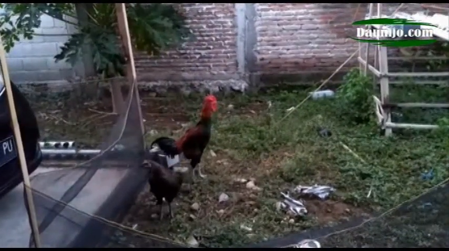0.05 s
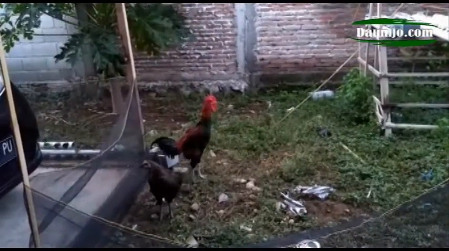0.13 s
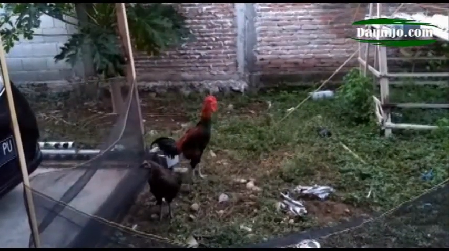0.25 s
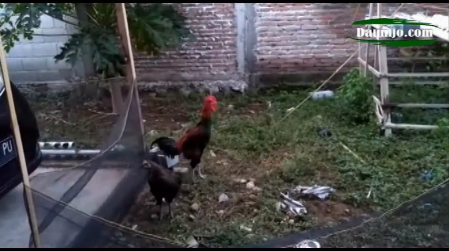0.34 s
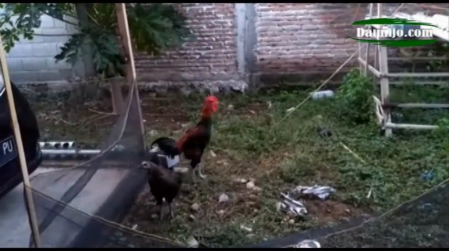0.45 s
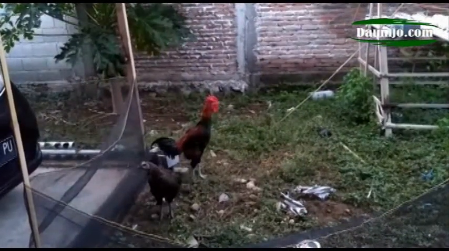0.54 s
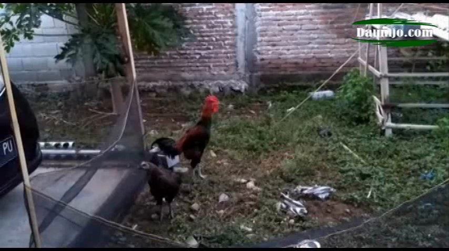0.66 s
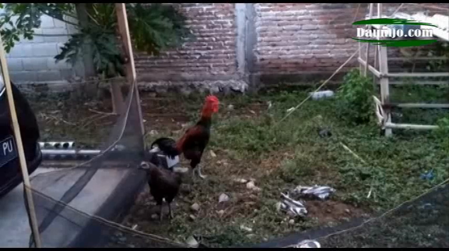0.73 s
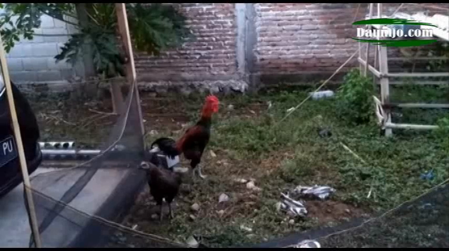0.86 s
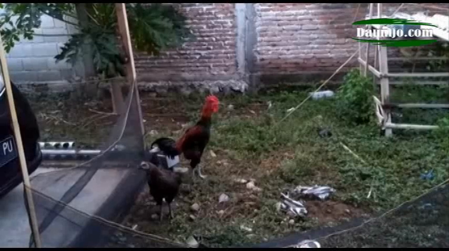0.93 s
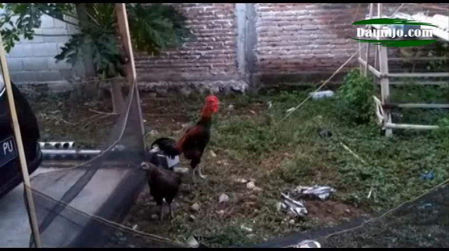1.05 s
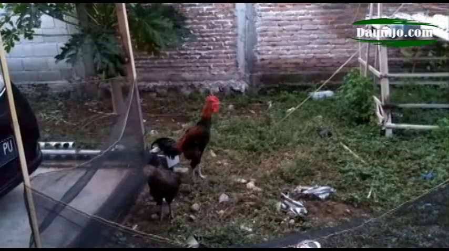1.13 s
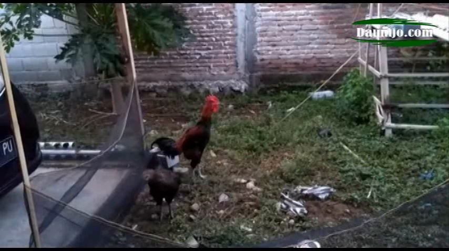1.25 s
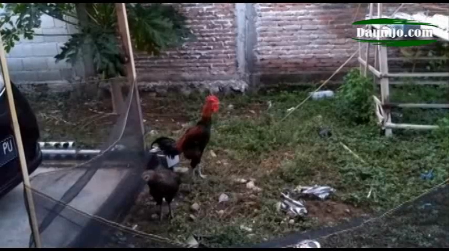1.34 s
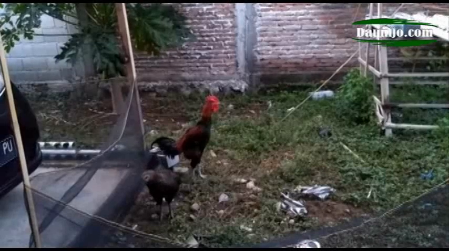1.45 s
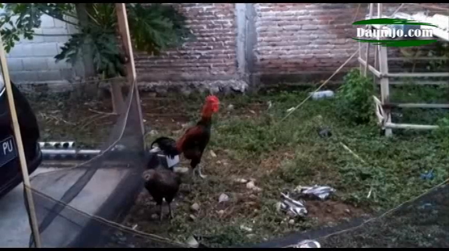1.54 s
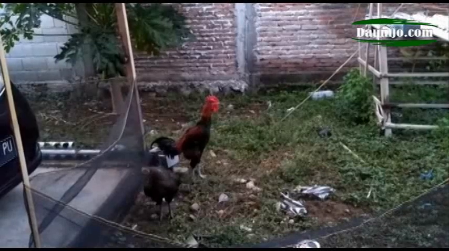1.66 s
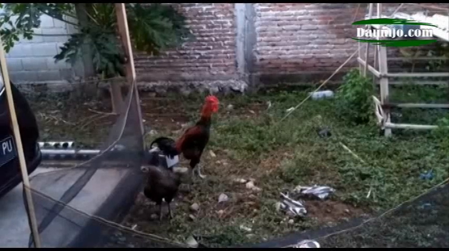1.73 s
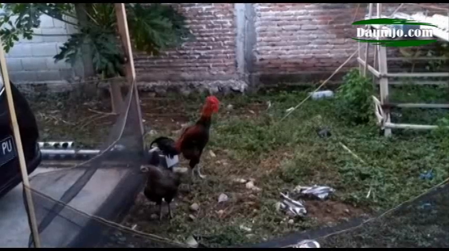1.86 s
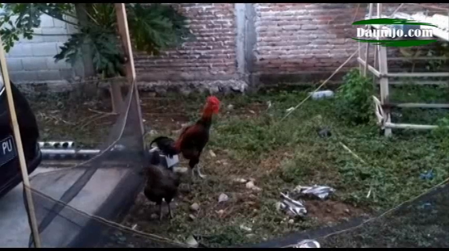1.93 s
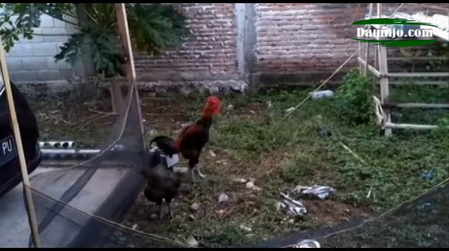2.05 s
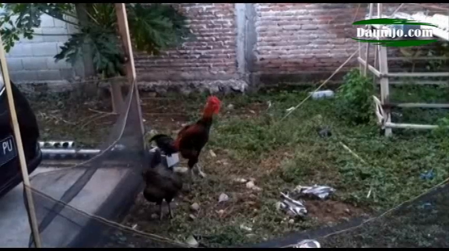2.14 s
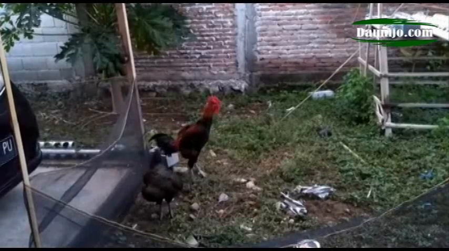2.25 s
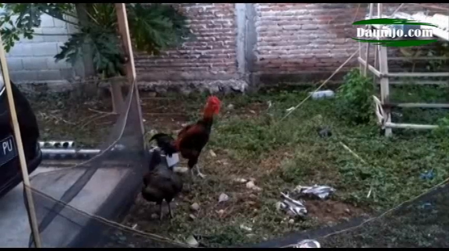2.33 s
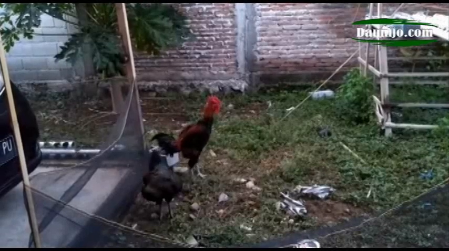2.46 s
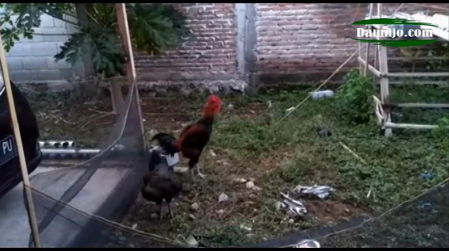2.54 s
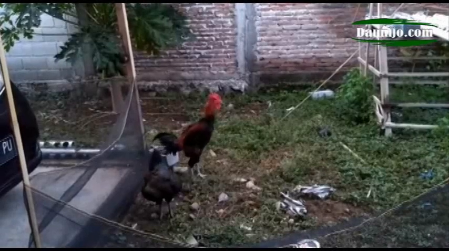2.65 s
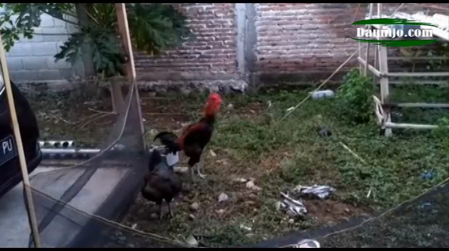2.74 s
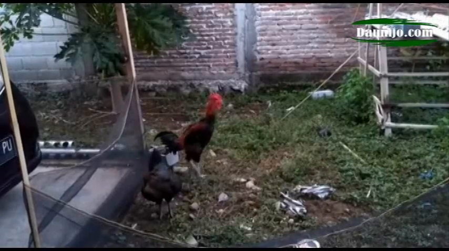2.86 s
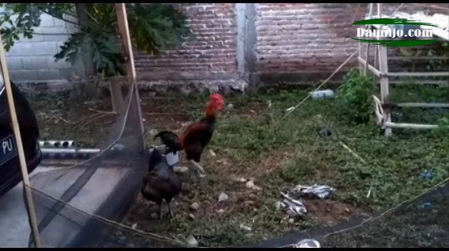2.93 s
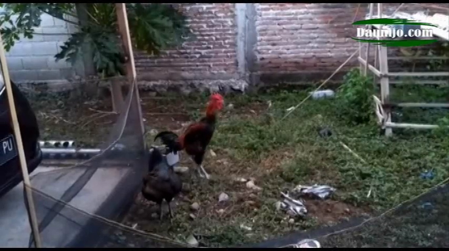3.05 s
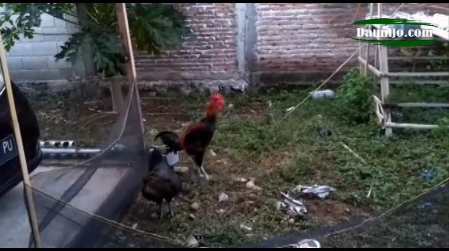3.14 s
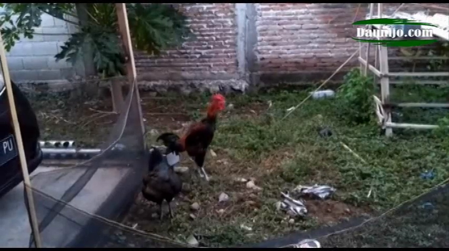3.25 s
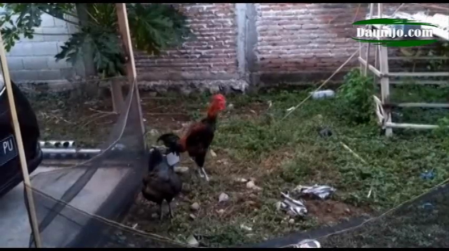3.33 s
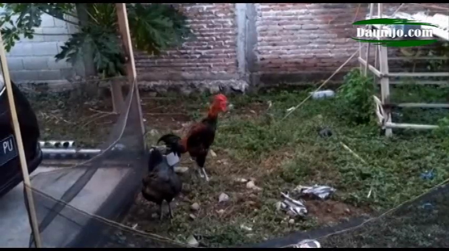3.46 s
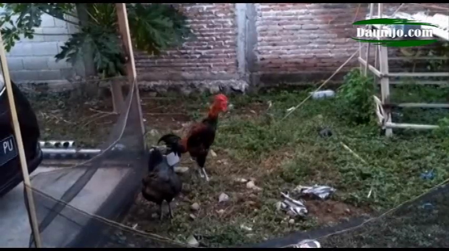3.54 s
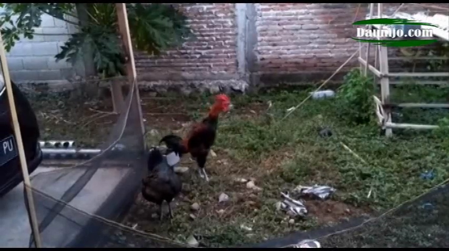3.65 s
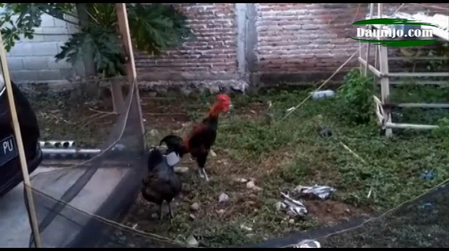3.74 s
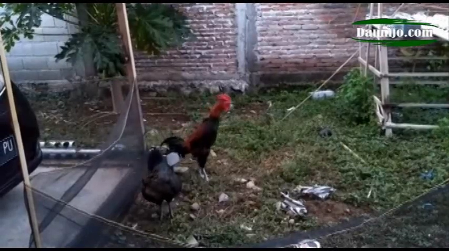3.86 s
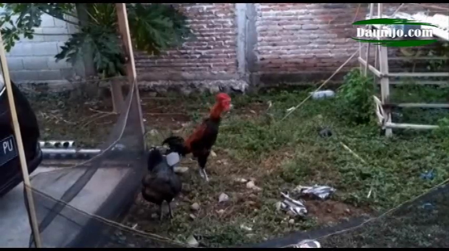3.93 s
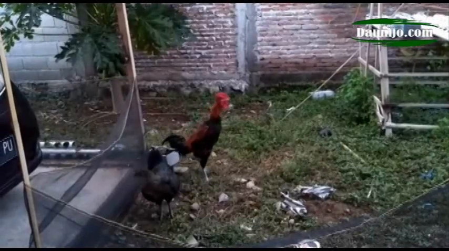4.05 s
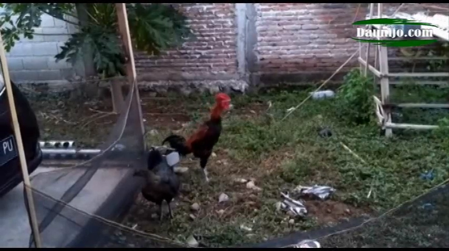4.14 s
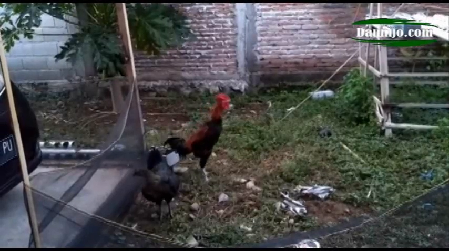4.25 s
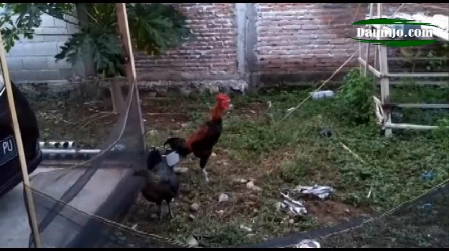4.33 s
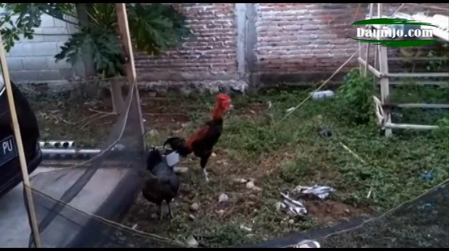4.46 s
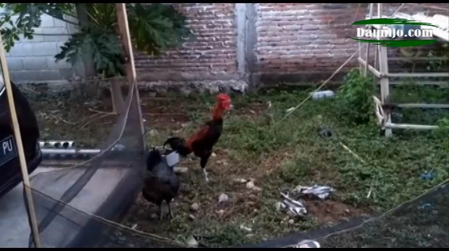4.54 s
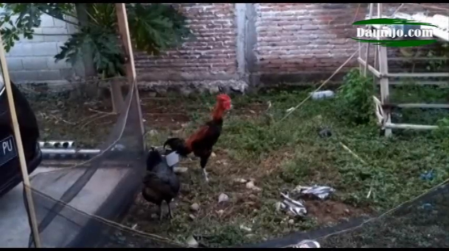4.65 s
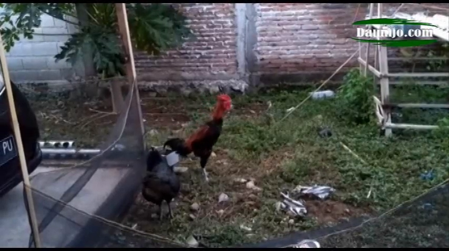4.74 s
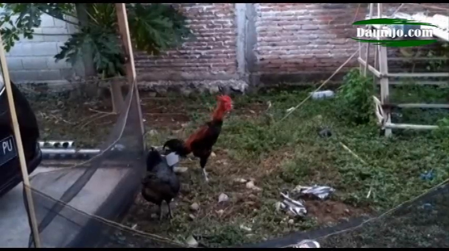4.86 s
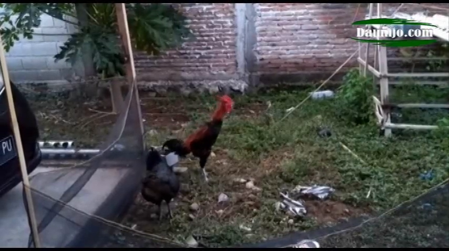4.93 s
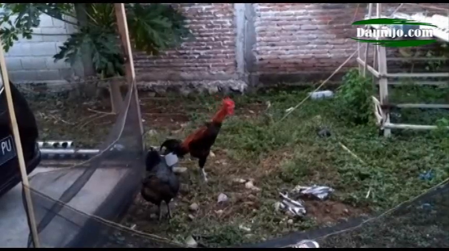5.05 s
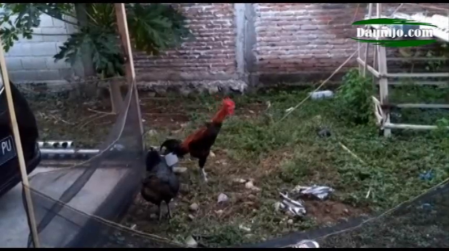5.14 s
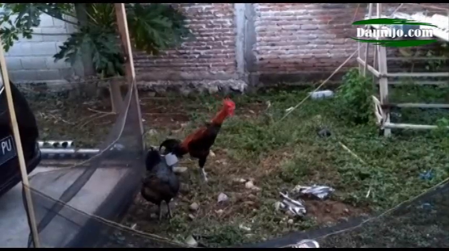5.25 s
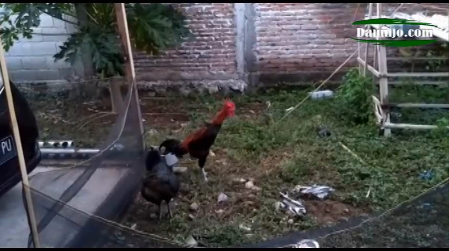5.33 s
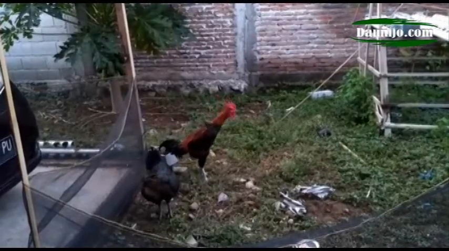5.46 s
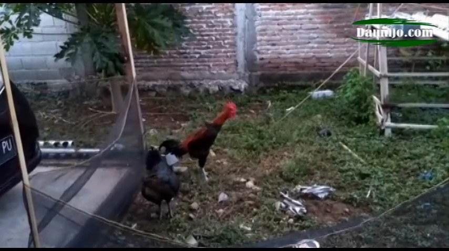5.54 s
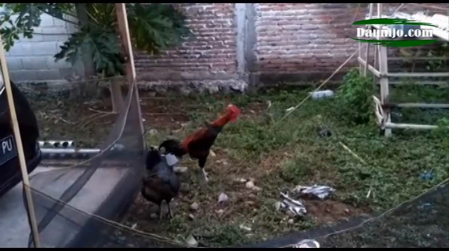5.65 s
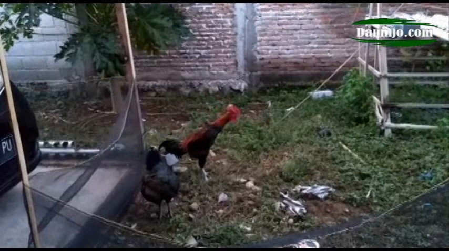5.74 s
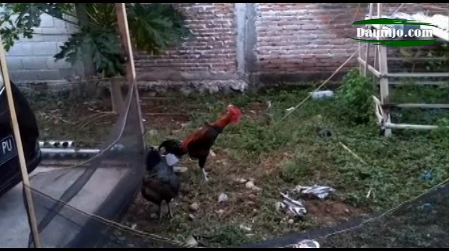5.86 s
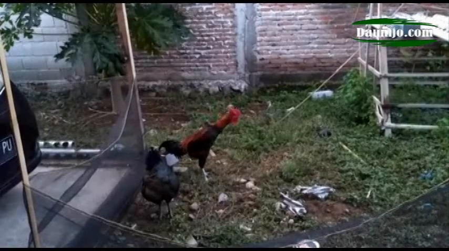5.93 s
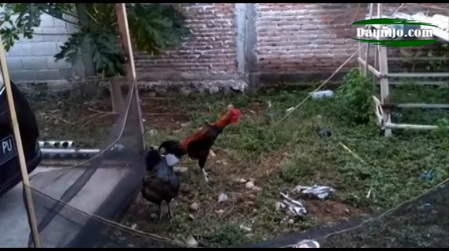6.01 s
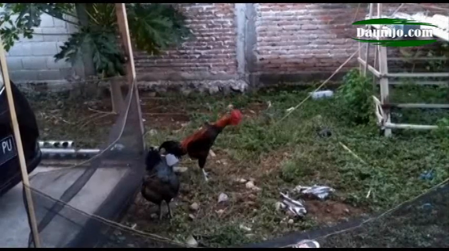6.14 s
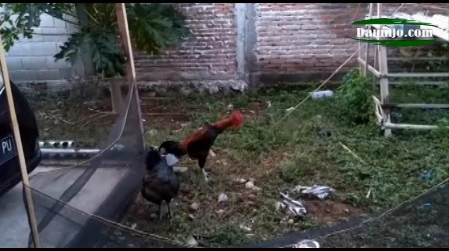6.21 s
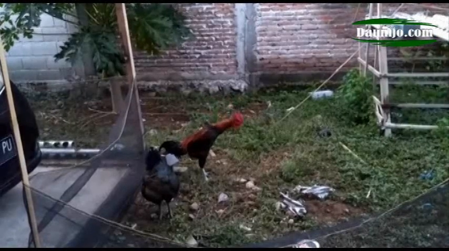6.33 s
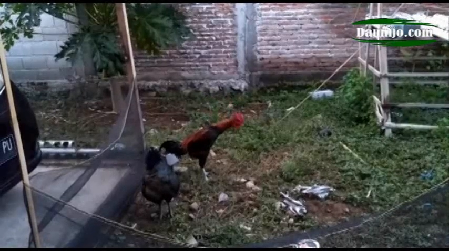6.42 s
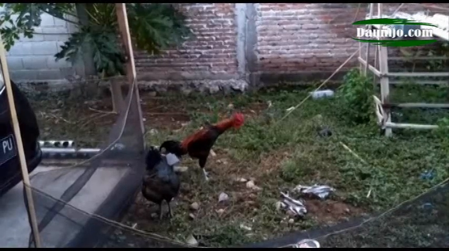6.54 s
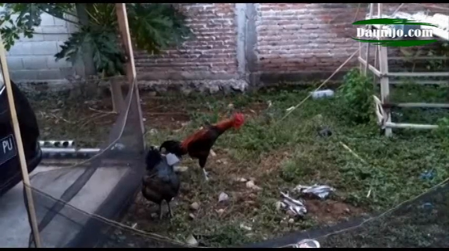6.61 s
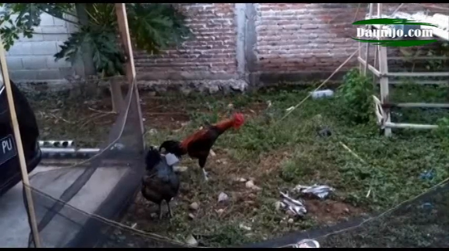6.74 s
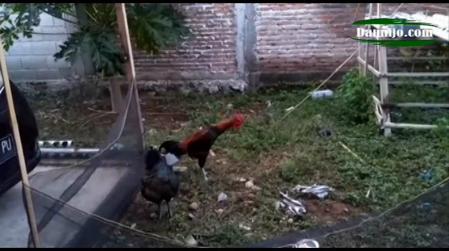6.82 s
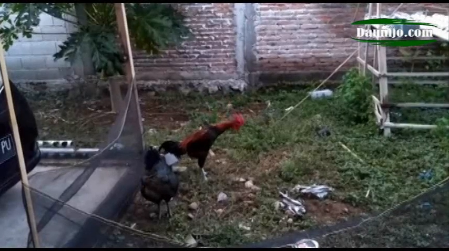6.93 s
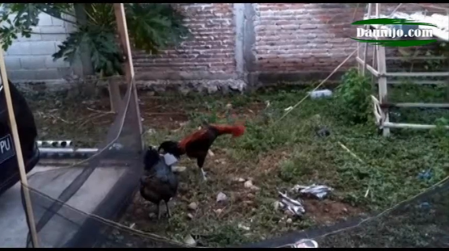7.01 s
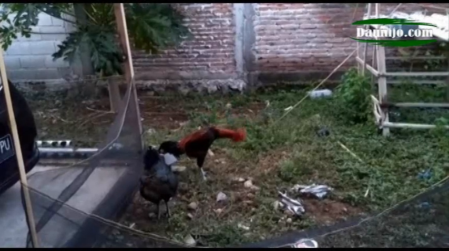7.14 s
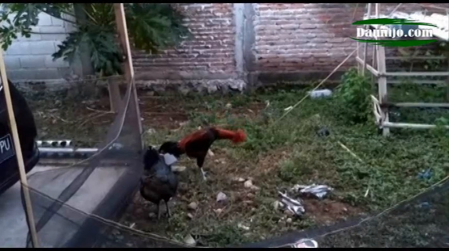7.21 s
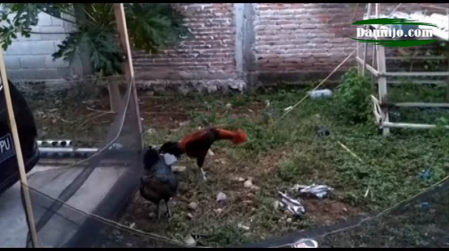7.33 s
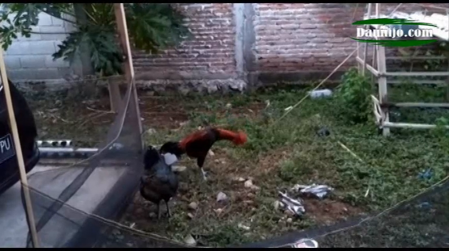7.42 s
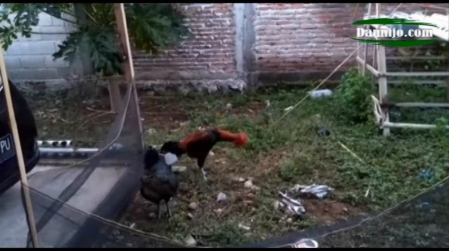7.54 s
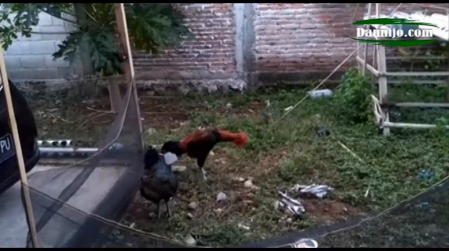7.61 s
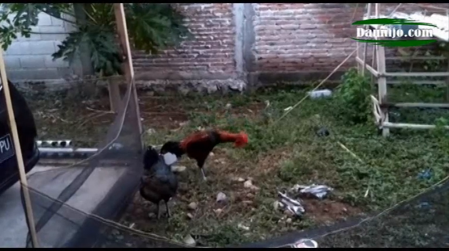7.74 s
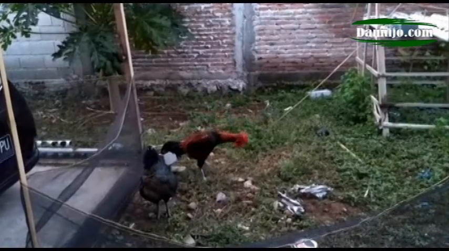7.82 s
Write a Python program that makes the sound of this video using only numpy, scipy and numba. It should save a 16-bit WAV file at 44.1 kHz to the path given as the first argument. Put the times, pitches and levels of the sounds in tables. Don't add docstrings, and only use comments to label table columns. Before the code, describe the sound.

A cricket chirps rapidly in a walled yard over faint insect drone, then a rooster rasps and holds a long, clear crow.

```python
import sys
import numpy as np
from scipy import signal
from scipy.fft import rfft, irfft
from scipy.io import wavfile
from scipy.ndimage import uniform_filter1d
from numba import njit

SR = 44100
rng = np.random.default_rng(int(sys.argv[2]) if len(sys.argv) > 2 else 0)


def transcribe(signal):
    frames = np.atleast_2d(signal).T
    limited = np.clip(frames, -1, 1)
    pcm = np.round(limited * 32767).astype(np.int16)
    wavfile.write(sys.argv[1], SR, pcm)


def nominal_scale(level):
    x = np.asarray(level, float) / 20
    return 10 ** x


N = 347508
TIME = np.arange(N) / SR
SOURCE_SR = 48000

# f/Hz, width/Hz, level/dB
HUM_MODES = [(79, 13, -9), (95.5, 12, -1.5), (120.4, 8, 4.5), (150.65, 6, 1.5), (184, 12, -10.5)]
# t/s, length/s, level/dB
ENGINES = [(-.2, 0.59, -62), (.35, 1.39, -60), (1.497, 0.56, -64), (2.194, 0.85, -66), (3.194, 0.83, -65.5),
           (4.2, .5, -66), (4.747, 0.66, -66), (5.701, 0.46, -76), (6.8, 0.87, -70)]
# f/Hz, density/dB per Hz
AIR_COLOUR = [(12, -59.5), (22, -6.5), (145, 0.5), (270, -15), (1200, -28), (2300, -31), (3000, -19.5),
              (4700, -32), (5400, -40), (7500, -21), (15700, -42), (20000, -51)]
AIR_DB = -73.5

# start t/s, end t/s, level/dB
CHOIR_BOUTS = [(-.5, 0.87, -69.5), (.7, 1.51, -65.5), (2.08, 3.29, -66), (3.2, 9, -66)]
CHOIR_HZ, CHOIR_FADE_S, CHOIR_WARMUP_HZ = 3625, 0.18, 90

# t/s, length/s, start f/Hz, end f/Hz, level/dB
BUZZES = [(-.1, 0.24, 7550, 7700, -71.5), (0.352, 0.33, 7530, 7300, -58.5),
          (0.701, 0.36, 7570, 7260, -57.5), (1.28, 0.23, 7100, 7050, -71.5), (1.5, .45, 6950, 6950, -85),
          (1.915, 0.29, 8000, 7900, -71.5), (2.87, 0.32, 7240, 7650, -63.5), (3.18, 0.42, 7200, 7650, -64),
          (3.6, 0.3, 7500, 7100, -65), (5.329, 0.24, 7380, 7240, -58), (5.713, 0.23, 7470, 7400, -63)]
# buzz level/dB, octave relative level/dB
BUZZ_OCTAVE = [(-63, -20), (-58, -9)]

# t/s, peak level/dB
CHIRPS = [(-.0626, -39), (.369, -39), (.605, -39), (.84, -38), (1.0802, -38.5), (1.3161, -39),
          (1.5545, -39.5), (1.7945, -39), (2.0303, -38), (2.2676, -38), (2.506, -39), (2.77, -39),
          (3.0073, -38.5), (3.448, -38.5), (3.713, -39), (5.4865, -37.5), (5.7257, -37), (5.963, -37),
          (6.199, -36.5), (6.434, -36.5), (6.668, -36.5), (6.901, -38.5)]
# t/s, peak level/dB
SHORT_CHIRPS = [(.1688, -39.5), (3.244, -38.5)]
STROKE_GAP_S, FIRST_STROKE_DB = .0329, -3
CRICKET_WET_DB, CROW_WET_DB, YARD_T60_S = -3.5, -9, 0.39

# t/s, length/s, start f/Hz, end f/Hz, level/dB
FAR_CALLS = [(0.307, 0.32, 2140, 2310, -71), (0.546, 0.2, 2320, 2220, -77), (1.195, 0.066, 2560, 2570, -80),
             (1.395, 0.1, 3220, 3200, -74), (1.46, 0.094, 2240, 2350, -77),
             (1.672, 0.17, 2570, 2650, -72.5), (2.5, 0.088, 3070, 2790, -70),
             (2.654, 0.075, 3050, 2800, -73), (2.63, .12, 630, 596, -80), (3.067, .1, 2480, 2530, -74.5),
             (3.64, 0.13, 2720, 2780, -77), (3.774, 0.12, 3020, 2680, -69)]

# t/s, syrinx rate f/Hz, effort level/dB, beak opening [0-1]
SHORT_RASP = [(3.995, 620, -42, 0.4), (4.013, 589.5, -35, 0), (4.032, 501.2, -36, 0.26),
              (4.075, 497.8, -33.5, 0.45), (4.12, 497.5, -39, 0.8), (4.132, 500, -46.5, .6),
              (4.21, 508, -72.5, 0.45)]
# t/s, syrinx rate f/Hz, effort level/dB, beak opening [0-1]
LONG_RASP = [(4.325, 535.8, -42, 0.26), (4.361, 500.5, -36, .2), (4.41, 517.2, -35, .9),
             (4.465, 467.2, -28.5, 0.17), (4.57, 471.9, -34.5, 0.91), (4.65, 489.7, -36.5, 0.76),
             (4.71, 497, -30.5, 0.37), (4.87, 501, -31, 0.26), (4.98, 455, -29, 0.048)]
# t/s, syrinx rate f/Hz, effort level/dB, neck stretch [0-1]
HELD_NOTE = [(5.04, 372, -28, 0.03), (5.43, 361.7, -33.5, 0.01), (5.6, 367.3, -33.5, 0.05),
             (5.9, 374.2, -33, 0.37), (6.4, 390.5, -33.5, 0.49), (6.95, 394.9, -33.5, 0.54),
             (7.3, 408.2, -32.5, 0.99), (7.6, 399.8, -34, 0.94), (7.88, 409.3, -32, 0.89)]
LOCK_S, ATTACK_S, WOBBLE_HZ = 5.02, 0.01, 3.

# f/Hz, width/Hz, level/dB
CHEST = [(495, 55, 8)]
# f/Hz, width/Hz, level/dB
THROAT = [(614.5, 184, -0.34), (700, 320, -0.16)]
# f/Hz, width/Hz, level/dB
WINDPIPE = [(985, 220, 13), (1350, 170, -5), (1428, 93, 11.5), (1712, 320, 0.5)]
# f/Hz, width/Hz, level/dB
BEAK = [(2690, 207, 8.5), (4550, 1740, -5.5), (5510, 246, 10), (6230, 470, -0.5)]
# f/Hz, width/Hz, level/dB
WHISTLE = [(7450, 1100, -10), (9800, 1800, -9), (11900, 1800, -9), (13650, 1000, 0), (15000, 1400, -3),
           (18000, 4000, -6)]
# beak shut level/dB, beak open level/dB
RASP_BANDS = [
    (-15, -0.5),
    (1.5, -7),
    (-11.5, 2),
    (-18, -14),
    (-12, -3.5),
]
# neck short level/dB, half level/dB, stretched level/dB
NOTE_BANDS = [
    (-33.5, -20.5, -26),
    (-0.5, -1, -8),
    (-9, -11.5, -7),
    (-29, -20, -15.5),
    (-22.5, -18, -8),
]

# multiple of the syrinx rate [1], level/dB
EARLY_PARTIALS = [(1, -35), (2, -8), (3, -7), (4, -6), (5, -24.5), (6, -36.5), (7, -19), (8, -36), (9, -47),
                  (10, -43), (11, -39), (12, -30.5), (13, -41), (14, -33.5), (15, -32.5), (16, -36),
                  (17, -61), (18, -52)]
# multiple [1], level/dB
MIDWAY_PARTIALS = [(1, -19), (2, -9), (3, -8.5), (4, -14.5), (5, -19.5), (6, -21.5), (7, -18.5), (8, -33),
                   (9, -26.5), (10, -27), (11, -26), (12, -17.5), (13, -18.5), (14, -14.5), (15, -28.5),
                   (16, -42), (17, -22.5), (18, -17.5)]
# multiple [1], level/dB
LATE_PARTIALS = [(1, -15), (2, 3), (3, -4), (4, -1.5), (5, -19.5), (6, -15.5), (7, -24), (8, -17), (9, -18),
                 (10, -34), (11, -20), (12, -1.5), (13, -16), (14, -1), (15, -7), (16, -36), (17, -16),
                 (18, -21)]
# f/Hz, early level/dB, late level/dB
HIGH_COLOUR = [(7000, -3.5, 2), (9000, -12.5, -11), (10400, -19, -9.5), (12200, -33, 5), (12340, -13, -1),
               (13200, 0.5, 1), (15450, -4.5, -8), (18300, -22, -18)]

# t/s, length/s, strength level/dB
JERKS = [(6.223, 0.029, 4), (6.369, 0.061, 6.5), (6.52, .025, 6), (6.611, .025, 6), (6.777, 0.0595, 2),
         (7.133, 0.036, 8), (7.392, 0.039, 6.5)]
JERK_SAG_HZ_PER_DB, JERK_LIFT = 0.56, 0.5

# strong-weak alternation [0-1], cycle jitter [share], size scatter/dB, breath level/dB
ONSET, RASPING = (.35, .025, 2.2, -9), (.87, .03, 2.5, -7)
CLEAR, STRAINED, BREAKING = (0, .001, .3, -27), (.03, .002, .7, -19), (.65, .004, 1.2, -16)
# t/s, state [the four values above]
VOICE = [(4.012, ONSET), (4.03, RASPING), (4.25, RASPING), (4.3, ONSET), (4.42, RASPING), (5.0, RASPING),
         (5.05, CLEAR), (6.8, CLEAR), (7.25, STRAINED), (7.74, STRAINED), (7.83, BREAKING)]


def level(x, db):
    return x * nominal_scale(db) / np.sqrt(np.mean(x ** 2) + 1e-30)


def even(x):
    return x / np.sqrt(uniform_filter1d(x ** 2, size=4000) + 1e-14)


@njit
def svf(x, hz, width):
    y, b, l = np.empty(len(x)), 0., 0.
    for i in range(len(x)):
        g, k = np.tan(np.pi * hz[i] / SR), width / hz[i]
        v = (b + g * (x[i] - l)) / (1 + g * (g + k))
        b, l, y[i] = 2 * v - b, l + 2 * g * v, k * v
    return y


def steep(x, hz, width):
    hz = np.clip(hz + np.zeros(N), 20., .45 * SR)
    return svf(svf(x, hz, 1. * width), hz, 1. * width)


def body(x, modes):
    return sum((-1) ** k * nominal_scale(db) * steep(x, hz, width) for k, (hz, width, db) in enumerate(modes))


def walk(rate, size=N):
    k = int(SR / rate)
    held = np.repeat(rng.standard_normal(size // k + 1), k)
    return 1.3 * uniform_filter1d(uniform_filter1d(held, k), k)[:size]


def swell(start, length):
    return np.sin(np.pi * np.clip((TIME - start) / length, 0, 1)) ** 0.58


def background():
    hum = 0
    for hz, width, db in HUM_MODES:
        mode = steep(rng.standard_normal(N), hz * (1 + 0.0071 * walk(1.55)), width)
        hum = hum + nominal_scale(db + 2.4 * walk(2.88)) * level(mode, 0)
    passing = nominal_scale(-86.5) + sum(nominal_scale(db) * swell(s, length) for s, length, db in ENGINES)
    hz, db = np.transpose(AIR_COLOUR)
    colour = nominal_scale(np.interp(np.log(np.fft.rfftfreq(N, 1 / SR) + 1), np.log(hz), db))
    air = irfft(rfft(rng.standard_normal(N)) * colour, N)
    return level(hum, 0) * passing + level(air, AIR_DB)


def drone():
    bouts = [np.clip(np.minimum(TIME - start, end - TIME) / CHOIR_FADE_S, 0, 1)
             for start, end, _ in CHOIR_BOUTS]
    hz = CHOIR_HZ - CHOIR_WARMUP_HZ * (1 - np.clip(sum(bouts), 0, 1)) + 20 * walk(2.03)
    band = steep(rng.standard_normal(N), hz, 150)
    throb = 1 + 0.08 * np.sin(2 * np.pi * np.cumsum(70 + 2 * walk(3.5)) / SR)
    effort = nominal_scale(-87) + sum(nominal_scale(db) * bout ** 0.91 for bout, (_, _, db) in zip(bouts, CHOIR_BOUTS))
    hush_db = np.interp(TIME, [4.4, 5.4], [0, 5])
    return level(band * throb, 0) * effort * nominal_scale(.7 * walk(20) - hush_db)


def katydids():
    strikes = np.sin(2 * np.pi * np.cumsum(140 + 3 * walk(4)) / SR)
    scrape = rng.standard_normal(N) * (1 + .6 * strikes)
    s, length, start_hz, end_hz, db = np.transpose(BUZZES)
    hz = np.interp(TIME, np.ravel([s, s + .9 * length], "F"), np.ravel([start_hz, end_hz], "F"))
    effort = sum(nominal_scale(d) * swell(a, b) ** 1.46 for a, b, d in zip(s, length, db))
    wing = steep(steep(scrape, hz, 1300), hz, 1300)
    octave = steep(steep(scrape, 1.96 * hz, 1500), 1.96 * hz, 1500)
    octave_db = np.interp(TIME, s + length / 2, np.interp(db, *np.transpose(BUZZ_OCTAVE)))
    return effort * (level(wing, 0) + level(octave, 0) * nominal_scale(octave_db))


def strokes():
    rows = []
    for table, count in ((CHIRPS, 3), (SHORT_CHIRPS, 2)):
        for s, db in table:
            rows += [(s + k * STROKE_GAP_S, db + FIRST_STROKE_DB * (k == 0)) for k in range(count)]
    return [row for row in rows if row[0] > 0]


def cricket():
    out, t = np.zeros(N + SR), np.arange(int(.03 * SR)) / SR
    for s, db in strokes():
        pitch, slide, size = rng.standard_normal(3)
        hz = 4850 * (1 + .003 * pitch) - 700 * (1 + 0.059 * slide) * (t / 0.019) ** 1.678
        angle = 2 * np.pi * np.cumsum(hz) / SR
        shape = np.clip(t / 0.0032, 0, 1) ** 0.46 * np.clip((.023 - t) / 0.012, 0, 1)
        overtone = nominal_scale(-31) + nominal_scale(-20) * np.exp(-((3 * hz - 14200) / 300) ** 2)
        tone = np.sin(angle) + overtone * np.sin(3 * angle)
        i = int(max(s - .003, 0) * SR)
        out[i:i + len(t)] += nominal_scale(db - 2.5 + 0.97 * size) * shape * tone
    return out[:N]


def yard(x, wet_db):
    t = np.arange(SR // 2) / SR
    sparse = rng.random(len(t)) < np.clip(.004 + 1.2 * t, 0, 1)
    decay = nominal_scale(-60 * t / YARD_T60_S) / np.sqrt(0.0013 + 3.6 * t)
    echoes = rng.standard_normal(len(t)) * sparse * (t > .004) * decay
    return x + nominal_scale(wet_db) * signal.fftconvolve(x, echoes / np.sqrt(np.sum(echoes ** 2)))[:N]


def far_birds():
    out = 0
    for s, length, start_hz, end_hz, db in FAR_CALLS:
        hz = np.interp(TIME, [s, s + length], [start_hz, end_hz])
        whistle = steep(rng.standard_normal(N), hz * (1 + 0.015 * walk(30.1)), 150)
        out = out + level(whistle, db) * swell(s, length)
    return out


def partials(angle, hz, stretch, first, last):
    out, held = np.zeros(N), slice(int(LOCK_S * SR), N)
    size = N - held.start
    colour_hz, early_db, late_db = np.transpose(HIGH_COLOUR)
    for k in range(first, last + 1):
        if k <= len(LATE_PARTIALS):
            stages = [table[k - 1][1] for table in (EARLY_PARTIALS, MIDWAY_PARTIALS, LATE_PARTIALS)]
            db = np.interp(stretch[held], [.15, .47, .9], stages)
        else:
            late = np.clip((stretch[held] - .4) / .14, 0, 1)
            db = (1 - late) * np.interp(k * hz[held], colour_hz, early_db)
            db = db + late * np.interp(k * hz[held], colour_hz, late_db)
        drift_db = min(1 + .2 * k, 4.5) * walk(4 + .3 * k, size)
        flicker_db = min(.7 * k, 2.8) * walk(22, size)
        out[held] += nominal_scale(db + drift_db + flicker_db) * np.sin(k * angle[held] + rng.uniform(0, 2 * np.pi))
    return out


def rooster():
    rows = np.vstack([SHORT_RASP, LONG_RASP, HELD_NOTE])
    hz, effort_db, shape = (np.interp(TIME, rows[:, 0], c) for c in rows[:, 1:].T)
    state_s, states = [s for s, _ in VOICE], np.transpose([state for _, state in VOICE])
    weak, jitter, scatter_db, breath_db = (np.interp(TIME, state_s, c) for c in states)
    clear = np.clip((TIME - LOCK_S) / 0.026, 0, 1)
    rasp = 1 - clear

    jerk_db = sum(db * np.exp(-((TIME - s) / length) ** 2) for s, length, db in JERKS)
    hz = hz - JERK_SAG_HZ_PER_DB * jerk_db + clear * (0.405 + shape) * WOBBLE_HZ * walk(25)
    angle = np.pi * np.cumsum(hz * (1 + jitter * (walk(300) + walk(40)))) / SR + 1e-6
    uneven = (1 + weak * np.cos(angle)) * nominal_scale(scatter_db * (.8 * walk(250) + walk(50)))
    count = 40
    pulses = (np.sin((2 * count + 1) * angle) / np.sin(angle) - 1) * uneven
    breath = rng.standard_normal(N) * (1 + np.cos(2 * angle))

    bands = ((CHEST, 0, (1, 1), JERK_LIFT, 0), (THROAT, -6, (2, 2), -1, 0),
             (WINDPIPE, -3, (3, 4), JERK_LIFT, 0), (BEAK, 12, (5, 18), 0, 5),
             (WHISTLE, 17, (19, 46), -.5, 0))
    voice = 0
    for (modes, hiss_db, span, jerk, lift_db), rasp_db, note_db in zip(bands, RASP_BANDS, NOTE_BANDS):
        opening_db = rasp * np.interp(shape, [0, 1], rasp_db)
        stretch_db = clear * np.interp(shape, [0, .5, 1], note_db)
        db = effort_db + opening_db + stretch_db + jerk * jerk_db + lift_db
        note = partials(2 * angle, hz, shape, *span) * uneven
        tone = rasp * even(body(pulses, modes)) + clear * even(note)
        blurred = np.array(modes[-3:]) * [1, 2.5, .5]
        hiss = rasp * even(body(breath, modes)) + clear * even(body(breath, blurred)) * nominal_scale(-3)
        voice = voice + even(tone + nominal_scale(breath_db + hiss_db) * hiss) * nominal_scale(db) * (-1) ** span[0]

    sounding = sum(np.clip((TIME - start) / ATTACK_S, 0, 1) ** 2 * (TIME < end)
                   for start, end in ((3.993, 4.25), (4.316, 9.)))
    return voice * sounding


def scene():
    far = background() + drone() + katydids() + far_birds()
    mono = far + yard(cricket(), CRICKET_WET_DB) + yard(rooster(), CROW_WET_DB)
    return np.array([mono, mono])


def low_pass(x):
    return signal.sosfilt(signal.butter(12, 15860, fs=SR, output="sos"), x)


def record(dry):
    fine = signal.resample(dry, N * SOURCE_SR // SR, axis=1)
    kept = fine[:, np.arange(N) * SOURCE_SR // SR]
    return low_pass(kept)


dry = scene()
out = record(dry)
transcribe(out)
```